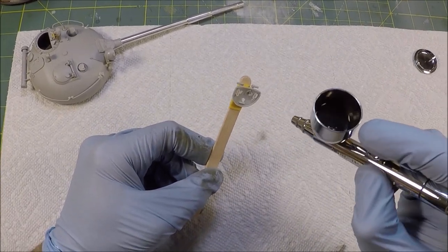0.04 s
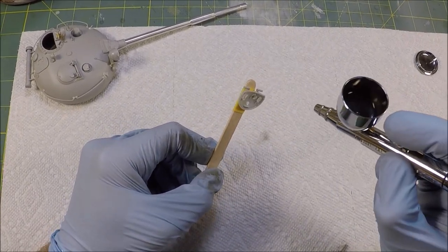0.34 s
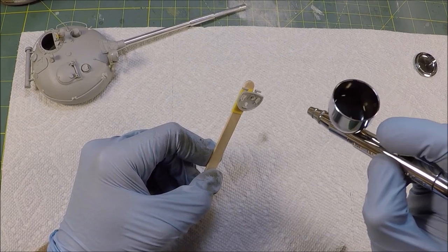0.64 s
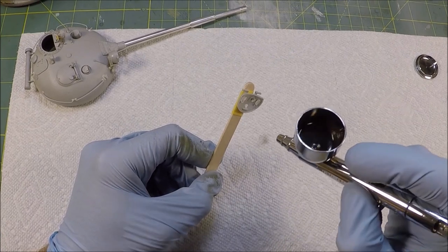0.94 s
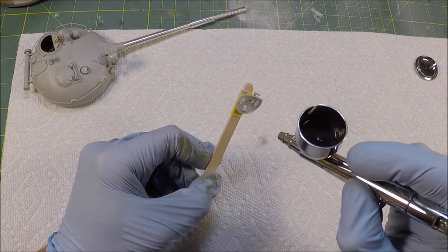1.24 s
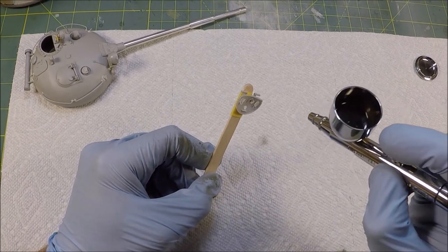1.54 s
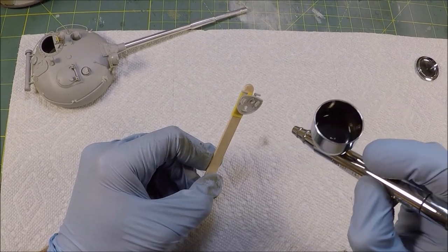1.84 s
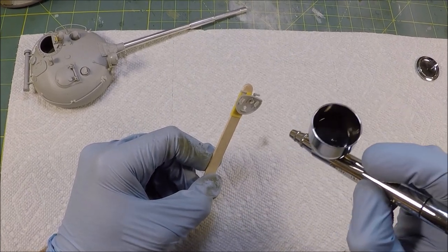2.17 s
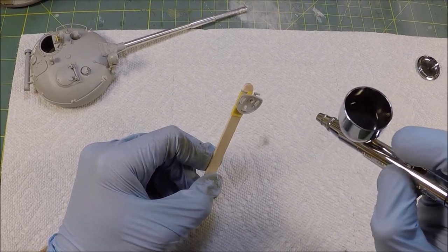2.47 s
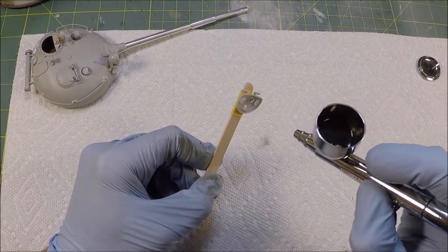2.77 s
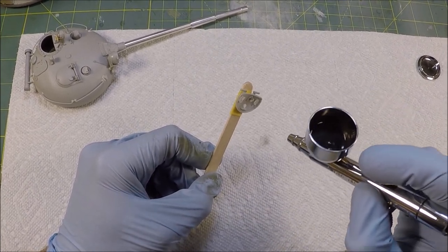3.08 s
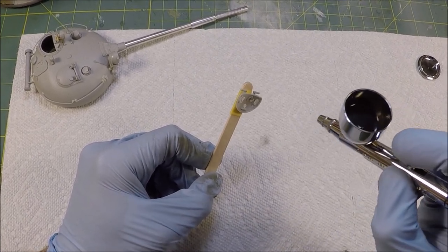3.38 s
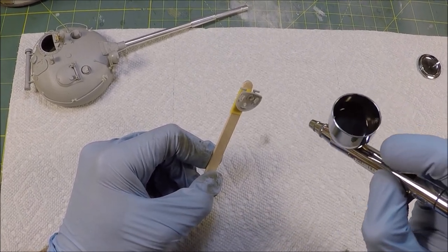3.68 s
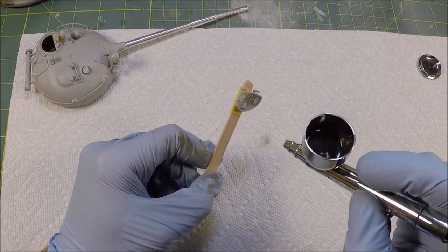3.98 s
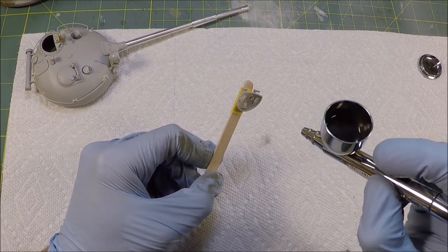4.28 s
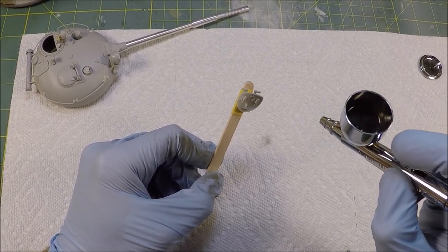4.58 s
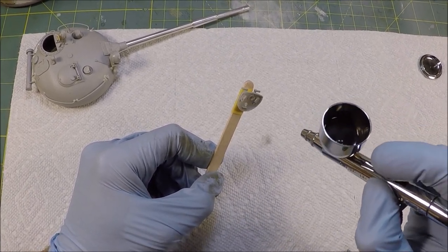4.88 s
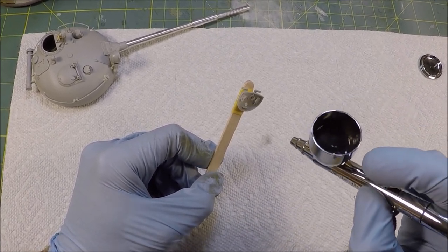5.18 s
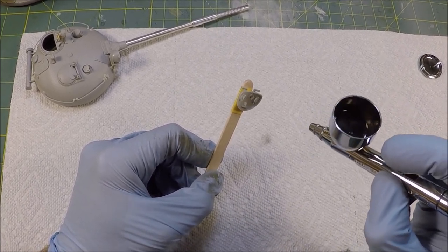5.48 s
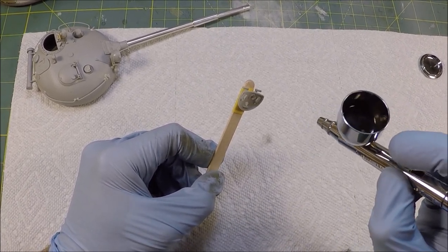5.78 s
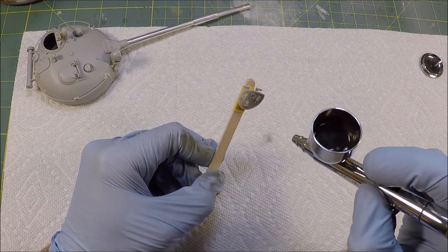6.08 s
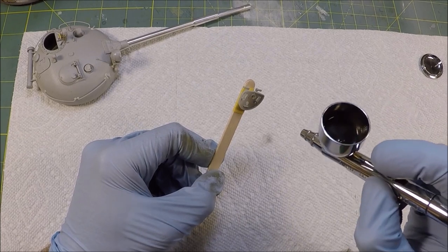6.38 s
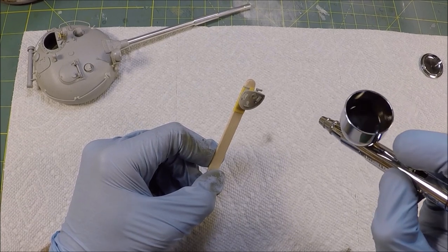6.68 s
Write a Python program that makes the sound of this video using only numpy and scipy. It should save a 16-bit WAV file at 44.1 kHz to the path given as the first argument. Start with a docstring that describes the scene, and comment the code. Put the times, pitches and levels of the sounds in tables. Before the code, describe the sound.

Faint workshop room noise and a low hum that throbs about ten times a second run from start to finish. Right at the start, handled metal gives a light tick, followed by a much fainter one at about 0.3 seconds. From about 0.5 seconds, a nearby airbrush sprays paint onto a small part in twelve short bursts, roughly two a second, each lasting between a third and half a second with a brief gap after it. Every burst is a thin, even hiss of air with a fuller, slightly ringing rush that swells and fades as the spray passes over the part. The air cuts off cleanly each time, leaving a very short room echo. The bursts are a little softer around 2 seconds and loudest from about 5.8 seconds, with the last one ending near 6.7 seconds.

```python
"""Faint workshop noise and a low hum that throbs about ten times a second are there from the start.
Metal being handled gives two faint ticks. Then an airbrush paints a small part in twelve short strokes.
In each, the trigger lets out a thin, steady hiss of air. A fuller, ringing rush of paint swells as the
spray sweeps onto the part and fades as it slides off. The valve shuts, and bench and room echo briefly."""
import sys
import numpy as np
from scipy import signal
from scipy.fft import rfft, irfft, next_fast_len
from scipy.io import wavfile
from scipy.ndimage import map_coordinates

SR = 44100
rng = np.random.default_rng(int(sys.argv[2]) if len(sys.argv) > 2 else 0)


def int16_out(signal):
    """Quantize to a 16-bit WAV file."""
    q = np.round(np.clip(np.atleast_2d(signal).T, -1, 1) * 32767)
    wavfile.write(sys.argv[1], SR, q.astype(np.int16))


N = 301017
TIME = np.arange(N) / SR
FREQ = np.maximum(np.arange(N + 1) * SR / (2 * N), 1)

# One trigger press a row. The rush peaks best_aim_s after start_s and is at half power fade_s later.
# start_s, stop_s, best_aim_s, fade_s, relative_level_db
STROKES = [ (0.541, 1.006, .35, 0.12, -45), (1.204, 1.486, .02, 0.23, -46.5),
           (1.692, 2.052, 0.25, 0.14, -47), (2.142, 2.44, 0.071, 0.19, -47.5),
           (2.606, 2.959, 0.21, 0.15, -46.5), (3.104, 3.448, 0.11, 0.12, -45.5),
           (3.573, 4.034, 0.3, 0.12, -45.5), (4.188, 4.538, 0.093, .16, -44.5),
           (4.69, 5.144, 0.27, 0.14, -45), (5.288, 5.681, 0.083, 0.17, -44.5),
           (5.793, 6.213, .268, 0.11, -42.5), (6.361, 6.672, .01, 0.18, -42.5), ]


def undb(db):
    """Turn decibels into a number to multiply a sound by."""
    return 10 ** (np.asarray(db) / 20)


def contour(table, column=1):
    """Join the points of a pitch and decibel table into a gain for every frequency."""
    points = np.array(table, float)
    return undb(np.interp(np.log(FREQ), np.log(points[:, 0]), points[:, column]))


def colour(sound, gain):
    """Turn each frequency of a sound up or down by its gain."""
    size = next_fast_len(N + SR // 2, real=True)
    bin_hz = np.arange(size // 2 + 1) * SR / size
    return irfft(rfft(sound, size) * np.interp(bin_hz, FREQ, gain), size)[..., :N]


def noise(middle, side):
    """Two shaped noises: the middle is what both ears share, the side is how they differ."""
    return np.array([colour(rng.standard_normal(N), gain) for gain in (middle, side)]) * np.sqrt(SR / 2)


def left_right(sound):
    """Turn middle and side into left and right."""
    middle, side = sound
    return np.array([middle + side, middle - side])


def wander(rate_hz):
    """A smooth random curve that mostly stays between -1 and 1."""
    return map_coordinates(rng.standard_normal(2048), [TIME * rate_hz], order=3, mode="mirror")


def workshop(rumble_hz=90, rumble_db=-1.5, waver_db=3.5):
    """Even room noise whose deepest rumble wavers."""
    # The tone of the quiet room: pitch_hz, middle_db, side_db
    room_tone = [(25, -103, -112), (50, -101, -110), (115, -109, -111), (143.5, -84, -87),
                 (204, -87.5, -88), (331, -94.5, -92), (600, -100, -92.5), (815, -103, -92),
                 (1420, -106, -99), (3060, -112, -112), (4500, -114, -117), (6040, -111.5, -112),
                 (10400, -115, -115), (15000, -129, -129)]
    air = noise(contour(room_tone), contour(room_tone, column=2))
    rumble = colour(air, 1 / (1 + (FREQ / rumble_hz) ** 12))
    return air - rumble + rumble * undb(rumble_db + waver_db * wander(16))


def hum(pitch_hz=160.5, beat_hz=9.766, first_beat_s=.053, swell_s=.0073, level_db=-54, uneven_db=2.5):
    """A low hum throbs: each beat is a soft swell of two or three waves with no deep bass."""
    beats = (TIME - first_beat_s) * beat_hz + .5
    from_peak_s = (beats % 1 - .5) / beat_hz
    beat_gains = undb(level_db + uneven_db * rng.standard_normal(128))
    swell = beat_gains[np.floor(beats).astype(int)] * np.exp(-(from_peak_s / swell_s) ** 2)
    throb = swell * np.cos(2 * np.pi * pitch_hz * from_peak_s)
    throb = colour(throb, 1 / np.hypot(1, (138 / FREQ) ** 12))  # cut below 138 Hz
    return np.array([throb, -.16 * throb])  # middle and side: a little to the right


def room_echo(sound, early_db=-12, early_fade_s=.18, late_db=-15, late_fade_s=.3, dull_hz=6000):
    """Nearby things scatter the sound at once; the walls add a faint, duller tail."""
    t = TIME[:SR // 2]
    echoes = []
    for db, fade_s in ((early_db, early_fade_s), (late_db, late_fade_s)):
        tail = rng.standard_normal((2, len(t))) * 1000 ** (-t / fade_s)  # 60 dB down after fade_s
        tail *= undb(db) / np.linalg.norm(tail, axis=1, keepdims=True)
        echoes.append(signal.fftconvolve(sound, tail, axes=1)[:, :N])
    nearby, walls = echoes
    return sound + nearby + colour(walls, 1 / np.hypot(1, FREQ / dull_hz))


def metal_ticks(scrape_hz=3900, width_hz=750, scrape_fade_s=.082):
    """Handled metal ticks: each touch is a brief scrape and a faint ring."""
    # The touches: start_s, relative_level_db
    touches = [(.006, -55.5), (.311, -70)]
    # The notes the metal rings with: pitch_hz, relative_level_db, fade_s (time to fall 60 dB)
    metal_notes = [(1630, -19, 0.64), (2500, -16, .35), (3245, -13, 0.45), (4040, -2, .04)]
    t = TIME[:SR // 2]
    ring = sum(undb(db) * 1000 ** (-t / fade_s) * np.sin(2 * np.pi * hz * t)
               for hz, db, fade_s in metal_notes)
    ticks = np.zeros(N)
    for start_s, db in touches:
        scrape = colour(rng.standard_normal(N), 1 / np.hypot(1, (FREQ - scrape_hz) / width_hz))[:len(t)]
        scrape = scrape / scrape.std() * 1000 ** (-t / scrape_fade_s)
        start = int(start_s * SR)
        ticks[start:start + len(t)] += undb(db) * (ring + scrape)
    return np.array([ticks, np.zeros(N)])  # all middle, no side


def valve(open_s=.015, close_s=.022):
    """How far the air valve is open, 0 to 1: it snaps open and springs back a little more slowly."""
    return sum(np.clip(np.minimum((TIME - start_s) / open_s, (stop_s - TIME) / close_s) + .5, 0, 1)
               for start_s, stop_s, *_ in STROKES)


def air_jet(gain_db=-.6):
    """Air at steady pressure leaves the nozzle as a thin, even hiss."""
    # The tone of the air alone: pitch_hz, middle_db, side_db
    hiss_tone = [(300, -108, -115), (1000, -102, -100), (2740, -100, -103), (4080, -94, -116),
                 (5020, -92.5, -90.5), (5720, -85, -89), (6400, -88, -86.5), (7200, -85, -85.5),
                 (8340, -92, -85), (9150, -93.5, -97), (10130, -93, -90.5), (11400, -99.5, -99),
                 (13600, -96, -100), (15000, -100, -102)]
    return noise(contour(hiss_tone), contour(hiss_tone, column=2)) * undb(gain_db)


def aim(off_part_db=-65, edge_steepness=3.07):
    """How strong the rush is: it swells as the jet sweeps onto the part and fades as it slides off."""
    power = np.full(N, undb(off_part_db) ** 2)
    for start_s, stop_s, best_aim_s, fade_s, db in STROKES:
        spraying = (TIME > start_s - .02) & (TIME < stop_s + .02)
        off_target = np.abs(TIME[spraying] - start_s - best_aim_s) / fade_s
        power[spraying] += undb(db) ** 2 * .5 ** (off_target ** edge_steepness)
    return np.sqrt(power)


def paint_rush(body_hz=2300, body_db=.64, waver_db=.62, flutter_db=.84):
    """Paint torn into droplets makes a ringing rush; the aim of the jet sets how loud it is."""
    # Where nozzle, part and bench ring: pitch_hz, half_width_hz, relative_level_db
    resonances = [(457, 54, -14.5), (905, 158, -8.5), (990, 140, -8.5), (1121, 29, -3.5), (1269, 66, -5.5),
                  (1520, 92, -7), (1718, 77, -3.5), (1790, 240, -7.5), (2497, 227, -8.5), (2820, 137, -9),
                  (3240, 109, -2), (3706, 244, -2.5), (3900, 63, 0.0), (3960, 43, -4.2), (4164, 53, -4.5),
                  (4347, 110, -4.5), (4600, 51, -7.5), (4876, 153, -6.5), (5410, 123, -6.5),
                  (5680, 124, -4), (5980, 58, -3), (6320, 240, -5), (6977, 890, -13.5), (7520, 160, -12),
                  (8930, 590, -17.5), (9600, 3200, -25.5)]
    # The part of the rush that differs between the ears: pitch_hz, relative_level_db
    side_tone = [(200, -42), (600, -24), (830, -5), (1100, -10), (1300, -12), (2000, -14.5), (2800, -12.5),
                 (3500, -22), (4000, -30), (4500, -29), (4900, -18), (6300, -11.5), (7200, -12),
                 (11500, -36)]
    ring_power = sum(undb(db) ** 2 / (1 + ((FREQ - hz) / half_width_hz) ** 2) ** 2
                     for hz, half_width_hz, db in resonances)
    bright_core = (FREQ > 2500) & (FREQ < 5000)  # the stroke levels apply to this band
    core_strength = np.sqrt(np.sum(ring_power[bright_core]) * SR / (2 * N))
    rush = noise(np.sqrt(ring_power), contour(side_tone)) / core_strength
    body = colour(rush, 1 / (1 + (FREQ / body_hz) ** 8))  # the low part wavers on its own
    rush = rush - body + body * undb(body_db + waver_db * wander(25))
    flutter = undb(flutter_db * wander(45))  # paint leaves the needle unevenly
    return rush * aim() * flutter


def scene(spray_db=-.5):
    """Air and paint pass one valve and echo in the room with the ticks, over room noise and hum."""
    # Each microphone hears the jet with its own tone: pitch_hz, left_minus_right_db
    balance = [(300, -2), (450, 5.5), (800, 3.5), (1000, -7.5), (1250, -5.5), (1550, 3.5), (1900, 2.5),
               (2500, 1.5), (3300, -2), (4700, 1.5), (5800, 0.5), (7000, 8.5), (8500, -1), (15000, 1)]
    spray = valve() * (air_jet() + paint_rush())
    left, right = left_right(room_echo(spray + metal_ticks()))
    lean_left = np.sqrt(contour(balance))
    foreground = np.array([colour(left, lean_left), colour(right, 1 / lean_left)])
    return undb(spray_db) * foreground + left_right(workshop() + hum())


def record(dry):
    """Cut the highest treble steeply, above 15350 Hz."""
    return signal.sosfilt(signal.ellip(12, .1, 80, 15350, fs=SR, output="sos"), dry)


dry = scene()
out = record(dry)
int16_out(out)
```